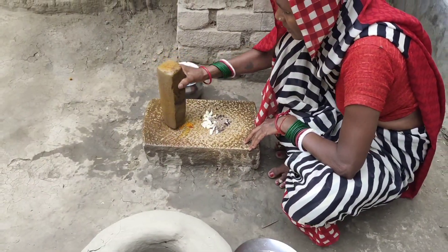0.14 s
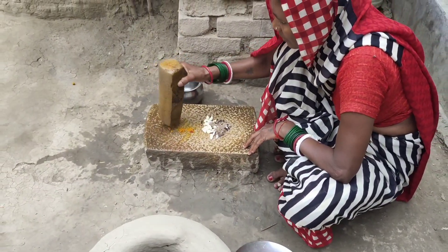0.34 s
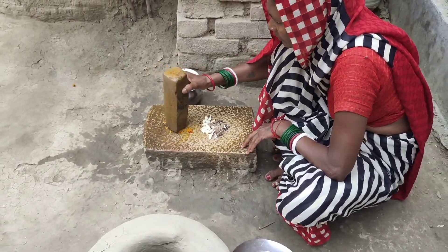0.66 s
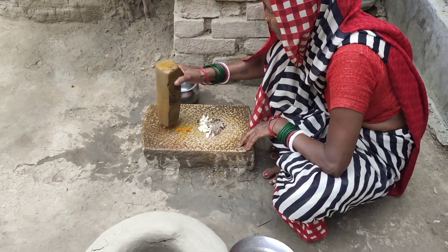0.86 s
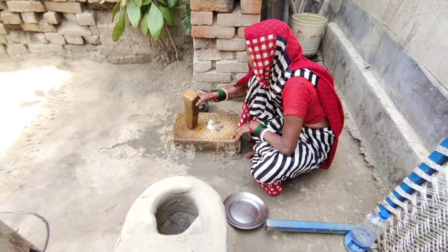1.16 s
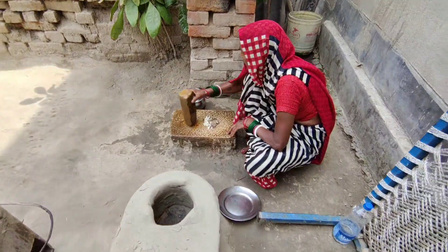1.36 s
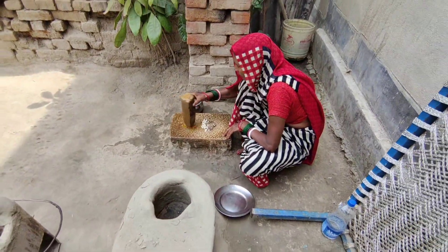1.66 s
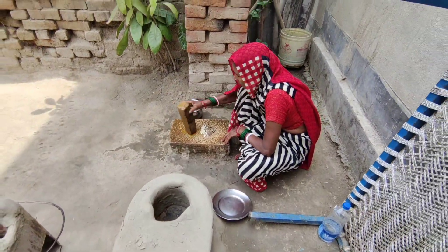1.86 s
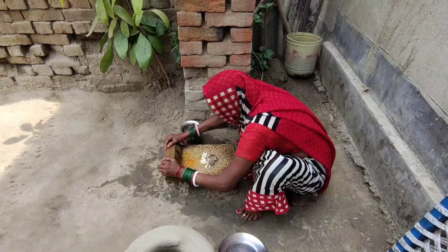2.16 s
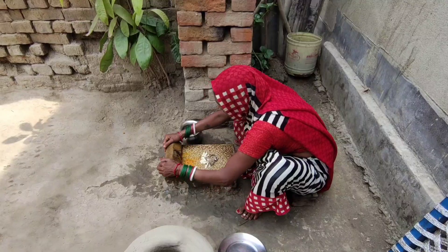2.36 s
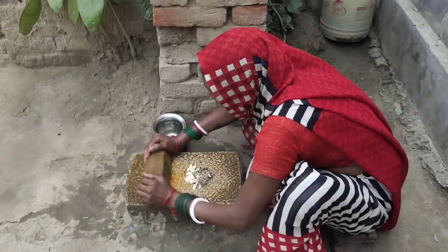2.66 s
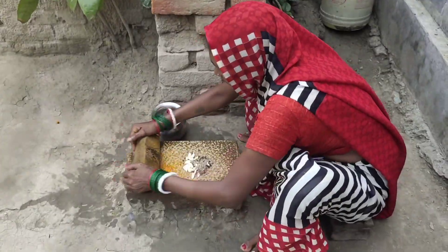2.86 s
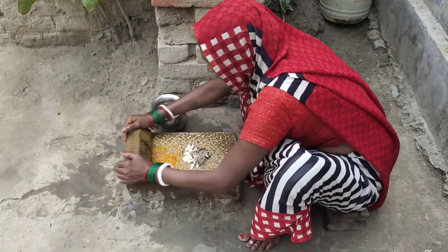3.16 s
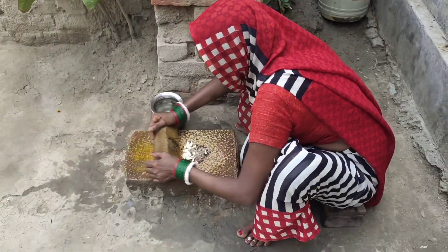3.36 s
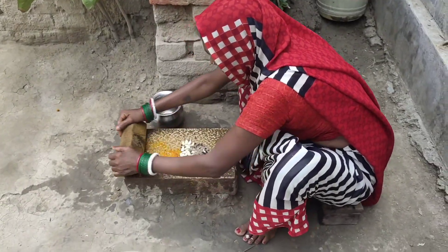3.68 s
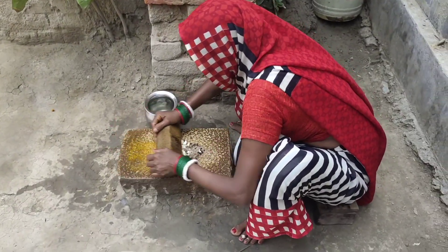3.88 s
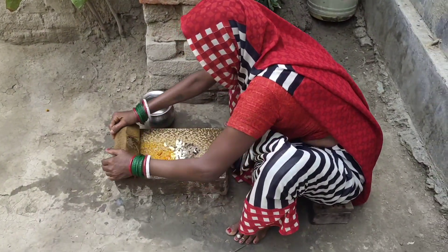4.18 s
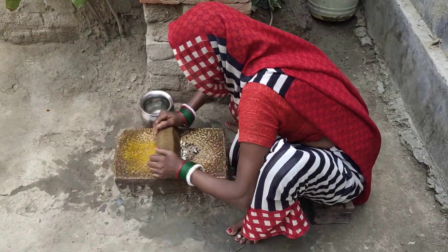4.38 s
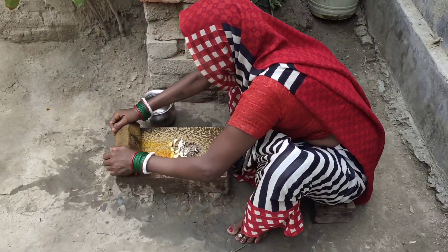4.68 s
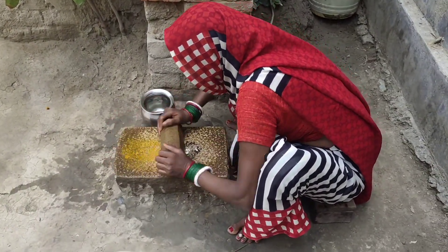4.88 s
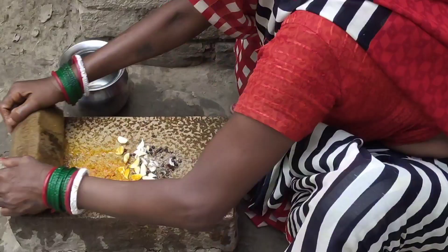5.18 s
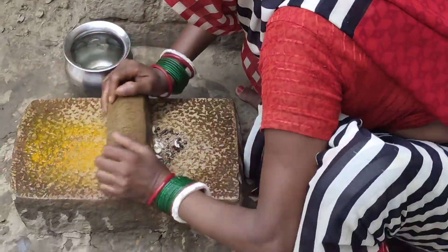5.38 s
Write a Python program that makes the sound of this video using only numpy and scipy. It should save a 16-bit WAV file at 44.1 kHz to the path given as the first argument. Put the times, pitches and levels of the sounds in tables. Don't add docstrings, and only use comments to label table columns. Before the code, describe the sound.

Seven heavy stone-on-slab blows with clinking glass bangles and a distant crow, then a brief silence and rapid gritty grinding with knocks.

```python
import sys
import numpy as np
from scipy import signal
from scipy.fft import rfft, irfft, next_fast_len
from scipy.io import wavfile
from scipy.ndimage import uniform_filter1d

SR = 44100
rng = np.random.default_rng(int(sys.argv[2]) if len(sys.argv) > 2 else 0)


def volts(x):
    e = np.asarray(x, float) / 20
    return 10 ** e


def pcm_store(signal):
    levels = np.round(np.clip(np.atleast_2d(signal), -1, 1) * 32767)
    wavfile.write(sys.argv[1], SR, levels.astype(np.int16).T)


N = 243873
TIME = np.arange(N) / SR


def level(x, db):
    return x * volts(db) / np.sqrt(np.mean(x ** 2))


def curves(spans):
    rows = np.concatenate(spans)
    on = sum((TIME > t[0][0]) & (TIME < t[-1][0]) for t in spans)
    return [np.interp(TIME, rows[:, 0], c) for c in rows.T[1:]], uniform_filter1d(1. * on, size=200)


def on_log(table, size):
    hz, value = np.transpose(table)
    return np.interp(np.log(np.fft.rfftfreq(size, 1 / SR) + 1), np.log(hz), value)


def coloured(table, size):
    spectrum = rfft(rng.standard_normal(size)) * volts(on_log(table, size))
    return level(irfft(spectrum, size), 0)


def band(x, hz, width, order=1):
    edges = np.sqrt(hz ** 2 + width ** 2 / 4) + np.array([-width, width]) / 2
    return signal.sosfilt(signal.butter(order, np.clip(edges, 20, 21000), "band", fs=SR, output="sos"), x)


def fade(t, t60):
    return np.exp(-np.log(1000) * t / t60)


def add(out, s, x):
    i = int(s * SR)
    out[..., i:i + x.shape[-1]] += x[..., :N - i]


def grains(rate, spread_db):
    hit, size, sign = rng.random((3, N))
    clicks = (hit < rate / SR) * volts(-spread_db * np.log(size + 0.0038))
    return level(clicks * np.sign(sign - .5), 0)


def walk(rate):
    k = int(SR / rate)
    steps = np.repeat(rng.standard_normal(N // k + 1), k)
    return 1.73 * uniform_filter1d(steps, size=k)[:N]


def soften(x, ms):
    t = TIME[:300] * 1000 / ms
    return signal.lfilter(t * np.exp(-t), 1, x)


def shaking(s, t60, hold, rise):
    t = (TIME - s).clip(0)
    return (1 - np.exp(-t / rise)) * fade((t - hold).clip(0), t60)


# time_s, gain_db
SCENE_GAIN = [(0, 0), (1.92, -0.5), (1.958, -8), (1.963, -97), (2.095, -93.5), (2.12, -18), (2.27, -22),
              (2.3, 0.5), (5.53, -5.5)]


def scene_gain_db(s):
    return np.interp(s, *np.transpose(SCENE_GAIN))


# frequency_hz, density_db_per_hz
YARD_AIR = [(35, -61.5), (60, -17), (514, 10), (711, -4.5), (2110, -4.5), (2840, -8), (4730, -8),
            (15000, -26)]


def air():
    shared = coloured(YARD_AIR, N)
    own = np.array([coloured(YARD_AIR, N), coloured(YARD_AIR, N)])
    return volts(-71) * (shared + own)


def traffic():
    return level(band(rng.standard_normal(N), 120.0, 200.0, order=2), -76) * volts(1.5 * walk(6.1))


# time_s, pitch_hz, level_db
CAWS = [
    [(0.51, 508.8, -61.5), (0.562, 508.2, -41.5), (0.718, 480.0, -44), (0.736, 442.5, -48),
     (0.8, 447.5, -70), (0.83, 460, -80)],
    [(1.04, 526, -75.5), (1.06, 511, -72), (1.1, 537, -80)],
    [(1.58, 542, -78.5), (1.64, 569.7, -66.5), (1.72, 599, -69.5)],
    [(1.76, 497, -54.5), (1.866, 456, -58.5), (1.952, 429, -68), (1.97, 467, -73.5)],
]
# frequency_hz, width_hz, level_db, rise_db_per_100_hz
BEAK = [(1000, 270, -10.5, 1.5), (1420, 360, -6, -2.5), (1812, 410, -5.5, -10), (2043, 440, 0, 1),
        (2420, 560, -14, 16.5), (3030, 1200, -16, -1.5)]


def crow():
    (hz, db), on = curves(CAWS)
    wander = level(uniform_filter1d(rng.standard_normal((2, N)), size=150), 0)
    shake = np.sin(np.cumsum(2 * np.pi * 68 * (1 + 0.098 * wander[0]) / SR))
    phase = np.cumsum(2 * np.pi * hz * (1 + 0.0401 * wander[1] + 0.016 * shake) / SR)
    pulses = sum(np.cos(k * phase) for k in range(1, 9))
    breath = 3.3 * rng.standard_normal(N) * (1 + np.cos(phase))
    source = pulses * (1 + 0.82 * shake) + breath
    voice = 0
    for f, width, gain, rise_db in BEAK:
        formant = level(band(source, 1. * f, 1. * width, order=2), 0)
        voice = voice + volts(gain + rise_db * (hz - 500) / 100) * formant
    return on * volts(db - 3.5) * voice


def walls(x, t60, wet_db):
    t = TIME[:SR // 2]
    echo = band(rng.standard_normal((2, len(t))), 900.0, 2500.0)
    echo = level(echo * fade(t, t60) * (1 - np.exp(-t / 0.00045)), wet_db)
    scatter = np.diff(rng.standard_normal((2, len(t) + 1))) * fade(t, .012)
    scatter = np.array([level(port, -11) for port in scatter])
    response = (echo + scatter) / np.sqrt(len(t))
    return signal.fftconvolve(x * np.ones((2, 1)), response, axes=1)[:, :N]


# time_s, level_db
SLEEVE_SWEEP = [
    (1.15, -65),
    (1.182, -56.5),
    (1.22, -53),
    (1.27, -60),
    (1.34, -61.5),
    (1.426, -71.5),
    (1.44, -71),
]


def sleeve():
    (sweep_db,), sweeping = curves([SLEEVE_SWEEP])
    fibres = rng.standard_normal(N)
    body = level(band(fibres, 1400.0, 3600.0, order=2), 4.1)
    edge = level(band(fibres, 2850.0, 1700.0, order=2), 0.5)
    return sweeping * (body + edge) * volts(sweep_db + 1.5 * walk(60))


# time_s, frequency_hz, peak_db, t60_s
LONE_RINGS = [(0.236, 5810, -41, 0.079), (0.245, 5700, -43, 0.07), (0.234, 11340, -38, 0.045),
              (0.245, 11230, -40, 0.057), (2.132, 719, -68.5, 0.1), (2.133, 1400, -74, 0.043),
              (2.306, 107.5, -42.5, 0.023), (2.306, 480, -42.5, 0.018), (4.533, 2680, -30, 0.034),
              (5.023, 1400, -41, 0.017), (5.44, 226, -54, 0.24)]


def lone_rings():
    out, t = np.zeros(N), TIME[:SR // 8]
    for s, hz, db, t60 in LONE_RINGS:
        ring = np.sin(2 * np.pi * hz * t) * fade(t, t60) * (1 - np.exp(-t / 0.000208))
        add(out, s, volts(db - scene_gain_db(s)) * ring)
    return out


TOP_HZ = 9700
OWN_SHARE = 3.7
# frequency_hz, width_hz, level_db
GLASS = [(3750, 130, -5), (5300, 200, -3), (5800, 130, -1), (6700, 220, -5), (8500, 180, -1),
         (9200, 200, -5), (10400, 300, -6), (11400, 200, -1), (12300, 350, 0), (12900, 300, -4)]
# time_s, peak_db, loudest_low_mode_hz, top_over_peak_db
POUND_CLINKS = [(0.069, -26.5, 5020, -46), (0.087, -32, 4700, -12), (0.105, -34.5, 5570, -4),
                (0.222, -37.5, 5840, -5), (0.245, -35.5, 5850, -15), (0.233, -39.5, 5530, -1),
                (0.344, -31.5, 5220, -19), (0.373, -36, 4200, -19), (0.4294, -51, 5300, -11),
                (0.472, -46, 5800, -13), (0.4943, -49, 5500, -12), (0.513, -44, 5840, -11),
                (0.5942, -27, 5450, -9), (0.644, -25, 5120, -8), (0.7667, -41.5, 5200, -14),
                (0.784, -38, 5640, -5), (0.8646, -31.5, 8700, -11), (0.8897, -23, 5470, -18),
                (0.93, -26.5, 4880, -2), (0.741, -39, 4050, -11), (1.0106, -35.5, 5220, -20.5),
                (1.037, -37.5, 5470, -19), (1.05, -38.5, 7800, 1), (1.1079, -51.5, 5500, 1.5),
                (1.1383, -43, 5770, -1.5), (1.155, -37.5, 5200, -5), (1.2364, -37.5, 4300, -24),
                (1.3254, -40.5, 3740, -8), (1.388, -47, 6870, -14), (1.713, -49.5, 3550, -9.5),
                (1.745, -30.5, 7200, -3.5), (1.1927, -26.5, 3920, -23.5), (0.616, -31, 5700, -10),
                (1.4432, -34, 4550, -27.5), (1.4693, -30.5, 5020, -3), (1.5865, -45, 6190, -11.5),
                (1.682, -41, 9430, -19), (1.733, -22.5, 8860, -8.5), (1.764, -29, 5950, -1.5),
                (1.8852, -30.5, 3720, -28.5)]
# time_s, peak_db, loudest_low_mode_hz, top_over_peak_db
GRIND_CLINKS = [(2.5206, -32.5, 4080, -10), (2.3268, -48.5, 4100, -4.5), (2.4924, -48, 3780, -4),
                (2.5423, -41.5, 6040, -8), (2.657, -42.5, 4330, -13), (2.7209, -40.5, 6800, -2.5),
                (2.7709, -34, 6450, -0.5), (2.8017, -41, 3850, -5.5), (2.9015, -39, 6740, -11.5),
                (3.0252, -40, 7870, -6.5), (3.0806, -40, 6020, -12.5), (2.94, -40, 6540, -9.5),
                (3.1401, -35, 6500, 5), (3.2009, -33.5, 4270, -16.5), (3.218, -31.5, 8410, -13.5),
                (3.2612, -39.5, 9100, -39), (3.3968, -48, 4540, -7), (3.413, -40.5, 7800, -2),
                (3.4253, -36, 7900, -14), (3.4527, -42, 7740, -6), (3.608, -39.5, 8240, 7),
                (3.662, -45, 4200, -6), (3.693, -36, 4130, -21), (3.9002, -40.5, 6260, -6),
                (3.966, -43, 6260, 8), (4.0925, -35, 4040, -20), (4.1012, -40, 5817, 6),
                (4.1382, -42, 3760, -10), (4.204, -33.5, 8200, -6), (4.452, -31, 8400, -1.5),
                (4.5602, -35.5, 9200, -32.5), (4.8442, -49, 7900, 8), (4.9131, -32, 8150, -24),
                (4.8545, -41, 3600, 1), (4.9249, -35, 8400, -7), (4.9423, -36.5, 8200, 3),
                (5.0527, -31.5, 9800, -4.5), (5.092, -38, 3970, 4), (5.12, -42, 4390, -1),
                (5.1628, -35.5, 3860, -0.5), (5.1936, -36, 6473, -19), (5.2701, -50, 3770, 6),
                (5.4204, -30.5, 3360, -26)]


def clinks():
    out, t = np.zeros((2, N)), TIME[:SR // 8]
    hz, width, db = np.transpose(GLASS)[:, :, None]
    for s, peak_db, low_hz, top_db in POUND_CLINKS + GRIND_CLINKS:
        r = rng.standard_normal((4, len(GLASS), 1))
        rings = volts(db + 2 * r[0]) * np.sin(2 * np.pi * hz * (1 + 0.023 * r[1]) * t + 3 * r[2])
        rings = rings * fade(t, 0.017 * np.exp(0.16 * r[3]))
        noise = rng.standard_normal((3, len(t)))
        decay = (fade(t, 0.021) + 0.16 * fade(t, 0.17)) * (1 - np.exp(-t / 0.00067))
        tick = (noise[0] + OWN_SHARE * noise[1:]) * decay
        low = level((rings * (hz < TOP_HZ)).sum(axis=0), -20.0)
        low = low + level(band(tick, 5380.0, 8800.0, order=2), 0.77)
        low = low + level(band(tick, low_hz, 320.0), 1.9)
        high = level((rings * (hz > TOP_HZ)).sum(axis=0), -1.4)
        high = high + level(band(tick, 10440.0, 6200.0, order=2), -3.2)
        high = high + level(band(tick, 11400.0, 380.0), -1.9)
        clink = low / np.abs(low).max() + volts(top_db) * high / np.abs(high).max()
        add(out, s, volts(peak_db - 2.5) * clink)
    return out


# start_s, level_db, top_over_level_db, settling_t60_s
JOLTS = [(0.065, -42.5, -6, 0.27), (0.225, -61, 12, 0.15), (0.346, -52, -3, 0.18), (0.47, -69.5, -20, 4.5),
         (0.594, -51, -3, 0.51), (0.886, -63.5, -9.5, 0.077), (0.93, -48, 0, 0.19), (1.048, -67, 3, 0.79),
         (1.19, -47, -19, 0.13), (1.444, -52, 3.5, 0.16), (1.54, -75, -11, 1.0), (1.73, -39, -3.5, 0.25),
         (1.884, -60, -17.5, 0.1)]
# start_s, level_db, top_over_level_db, settling_t60_s, shaken_for_s
SHAKES = [(2.289, -67.5, 5.5, 0.12, 0.05), (2.448, -76.5, 12, .3, 0.039), (2.52, -51, -3, 0.25, 0.014),
          (2.646, -52.5, -1, 0.32, 0.2), (2.882, -50, -10, 0.13, 0.011), (2.94, -53, -5, 0.64, 0.098),
          (3.141, -46, -18, 0.48, 0.012), (3.403, -49, -8.5, 1, 0.083), (3.605, -48.5, -4, 0.037, 0.077),
          (3.888, -47, -8, 0.76, 0.011), (4.094, -49, 1.5, 0.23, 0.064), (4.34, -51.5, -11, 0.27, 0.15),
          (4.558, -44, -0.5, 0.18, 0.029), (4.845, -51.5, -2, 0.17, 0.1), (5.045, -53.5, 7, 0.22, 0.08),
          (5.158, -54, 3, 0.12, 0.015), (5.19, -54, 4, 0.25, 0.02), (5.342, -53.5, -0.5, 0.3, 0.045),
          (5.418, -45.5, -3.5, 0.4, 0.06)]


def rattle():
    moves = [(db, top_db, shaking(s, t60, 0, 0.007)) for s, db, top_db, t60 in JOLTS]
    moves += [(db, top_db, shaking(s, t60, hold, 0.0065)) for s, db, top_db, t60, hold in SHAKES]
    loose = sum(volts(db) * shape for db, top_db, shape in moves)
    bright = sum(volts(db + top_db) * shape for db, top_db, shape in moves)
    own = np.array([grains(1200, 1.3) + 0.3 * rng.standard_normal(N) for port in range(2)])
    touch = (grains(1500, 0.59) + OWN_SHARE * own) * volts(2 * walk(45))
    modes = []
    for f, width, gain in GLASS:
        mode = level(band(touch, 1. * f, 1. * width), 0)
        modes.append((f, volts(gain + 3 * walk(14)) * mode))
    low = level(sum(m for f, m in modes if f < TOP_HZ), -5.5)
    low = low + level(band(touch, 8060.0, 5900.0, order=3), -4.5)
    high = level(sum(m for f, m in modes if f > TOP_HZ), 0.9)
    high = high + level(band(touch, 11580.0, 4300.0, order=3), -4.5)
    cloth = level(band(touch, 3300.0, 2100.0, order=3), -6)
    return volts(-4.5) * (loose * (low + cloth) + bright * high)


# time_s, peak_db, weight_below_700_hz_db
TAPS = [(2.354, -46, 5), (2.4, -37, -2), (2.414, -34, -2.5), (2.548, -36, -4), (2.581, -32, -5),
        (2.593, -30, -7.5), (2.628, -38, 0), (2.842, -49.5, 3), (2.863, -45, -2), (3.02, -31, -4),
        (3.086, -38.5, 3), (3.244, -37, 0.5), (3.295, -38.5, -4), (3.331, -48, -2), (3.352, -34, -9.5),
        (3.49, -48.5, -9), (3.508, -29, -8), (3.548, -32.5, -10), (3.565, -37.5, -1), (3.719, -42, -6),
        (3.74, -30.5, -5), (3.777, -33, -6), (3.805, -39.5, 3), (3.944, -49, -8), (3.904, -33.5, -8),
        (3.993, -36.5, -9), (4.043, -30.5, -2), (4.229, -41, -8), (4.268, -38, -2), (4.351, -41, -2),
        (4.381, -47, 7.5), (4.488, -39.5, -1.5), (4.532, -29, -10), (4.655, -48.5, 0), (4.698, -34.5, -3),
        (4.748, -40, -6), (4.778, -43, 1.5), (4.822, -48.5, 4.5), (4.844, -34.5, -10), (4.882, -26, -14),
        (4.936, -36.5, -0.5), (5.009, -31.5, -5), (5.025, -39, 1), (5.052, -42.5, 1.5), (5.158, -48, 4.5),
        (5.236, -38, -6)]
# time_s, peak_db, weight_below_700_hz_db, centre_hz
LAST_TAPS = [
    (5.3224, -13, -17, 1800),
    (5.3318, -23, -17, 1900),
    (5.3976, -12.5, -17, 1800),
    (5.428, -18, -22, 1500),
]


def taps():
    out, t = np.zeros(N), TIME[:SR // 8]
    edge_hz = 1345
    for s, db, low_db, hz in [(*tap, edge_hz) for tap in TAPS] + LAST_TAPS:
        rock = rng.standard_normal(len(t))
        push = soften((t == 0) + 0.055 * rock * fade(t, 0.045), 0.057)
        edge = band(push, hz, .85 * hz, order=2) + 0.7 * band(push, 2800.0, 1300.0, order=2)
        slab = band(push + 0.13 * rock * fade(t, 0.082), 521.0, 780.0, order=2)
        tap = edge / np.abs(edge).max() + volts(low_db) * slab / np.abs(slab).max()
        add(out, s, volts(db + 1.0) * tap)
    return out


# frequency_hz, width_hz, level_db
STONES = [(321, 20, -3), (480, 230, 6), (692.5, 25, 0.5), (1000, 30, -25), (1154, 140, 4.5),
          (1400, 830, -5), (1580, 104, -7), (2145, 210, -6), (2680, 62, -1)]
# start_s, fastest_s, end_s, rumble_db, grit_db
STROKES = [(2.328, 2.356, 2.41, -51, -63), (2.41, 2.39, 2.5, -64, -75), (2.543, 2.635, 2.675, -48, -48),
           (2.73, 2.876, 2.94, -54.5, -65), (3.008, 3.104, 3.13, -46, -51),
           (3.199, 3.278, 3.38, -47.5, -53.5), (3.477, 3.588, 3.61, -47, -49),
           (3.667, 3.759, 3.785, -41.5, -54.5), (3.895, 3.914, 4, -52, -51),
           (3.987, 4.02, 3.98, -43.5, -45), (4.024, 4.059, 4.12, -43.5, -50.5),
           (4.189, 4.247, 4.23, -42, -52), (4.255, 4.281, 4.35, -48, -62), (4.366, 4.385, 4.48, -66.5, -58),
           (4.48, 4.542, 4.61, -48.5, -55.5), (4.625, 4.7, 4.79, -44, -56.5),
           (4.881, 4.879, 4.93, -48, -47), (4.934, 4.96, 4.98, -58.5, -68), (4.996, 5.025, 4.68, -53, -62),
           (5.15, 5.248, 5.7, -59, -70), (5.33, 5.33, 4.4, -60, -76), (5.39, 5.44, 4.7, -41, -75)]


def grinding():
    slips = (grains(900, 1.7) + 0.56 * rng.standard_normal(N)) * volts(2.1 * walk(70))
    modes = []
    for f, width, gain in STONES:
        mode = level(band(slips, 1. * f, 1. * width), 0)
        modes.append((f, volts(gain + 1.5 * walk(9)) * mode))
    rumble = level(band(sum(m for f, m in modes if f < 900), 389.0, 620.0, order=2), 0)
    grit = level(band(sum(m for f, m in modes if f > 900), 1870.0, 1590.0, order=2), 0)
    husks = level(band(slips, 3780.0, 1400.0, order=3), 0)
    grit = grit + volts(-7) * husks
    out = np.zeros(N)
    for start, fastest, end, rumble_db, grit_db in STROKES:
        speed = np.sin(np.interp(TIME, [start, fastest, end], [0, np.pi / 2, np.pi])).clip(0)
        out += volts(rumble_db) * speed ** 1.11 * rumble
        out += volts(grit_db) * speed ** 1.66 * grit
    return out


# time_s, thud_peak_db, crack_db, edge_ring_db
POUNDS = [
    (0.07, -28.5, -33, -51),
    (0.348, -30, -37.5, -50),
    (0.615, -29, -32, -49),
    (0.889, -25.5, -39, -33.5),
    (1.157, -31.5, -56.5, -82.5),
    (1.445, -26.5, -34, -44),
    (1.731, -25, -32.5, -46.5),
]
# frequency_hz, level_db, t60_s
SLAB = [(314.4, -0.5, 0.05), (396, 3, 0.024), (538.5, -4.5, 0.036), (676, -9.5, 0.03)]
# frequency_hz, density_db_per_hz
GROUND = [(29, -28), (50, -7), (145, -0.5), (313, -7.5), (627, -7.5), (800, -15.5), (1040, -53.5),
          (1760, -120)]


def pounds():
    out, t = np.zeros(N), TIME[:SR // 2]
    for s, db, crack_db, edge_db in POUNDS:
        ring = np.zeros(len(t))
        for hz, gain, t60 in SLAB:
            stronger, higher = rng.standard_normal(2)
            mode = np.sin(2 * np.pi * hz * (1 + 0.025 * higher) * t) * fade(t, t60)
            ring += volts(gain + 2.1 * stronger) * mode
        ring = -ring * (1 - np.exp(-t / 0.0017))
        ring = ring / np.abs(ring).max()
        soil = coloured(GROUND, len(t)) * (1 - np.exp(-t / 0.016))
        boom = band(soil, 100.0, 140.0) * fade(t, 0.38)
        boom = boom + band(soil, 240.0, 130.0) * fade(t, 0.3)
        boom = boom + band(soil, 420.0, 400.) * fade(t, 0.18)
        crack = band(rng.standard_normal(len(t)), 4000.0, 5000., order=2)
        crack = crack * (fade(t, 0.0083) + volts(-22) * fade(t, .25))
        edge = band(rng.standard_normal(len(t)), 944.0, 650.0, order=2) * fade(t, 0.031)
        add(out, s, volts(crack_db + 5.5) * crack)
        thud = volts(db + 0.5) * (ring + volts(-12.5) * boom)
        add(out, s + .0022, thud + volts(edge_db + 18.5) * edge)
        add(out, s + .023, volts(db - 11) * ring)
    return out


def scene():
    bird = crow()
    near = sleeve() + lone_rings() + clinks() + rattle() + taps() + grinding() + pounds()
    mix = air() + traffic() + bird + near
    mix = mix + walls(bird, t60=0.27, wet_db=-0.5) + walls(near, t60=0.19, wet_db=-13)
    return mix * volts(scene_gain_db(TIME))


# frequency_hz, gain_db
PORT_GAIN = [(60, -4.5), (110, -2.5), (200, .5), (380, 2.5), (700, 1.5), (2380, 4.5), (4400, 4), (15000, 8)]
# frequency_hz, phase_rad
PORT_PHASE = [(60, 0.44), (150, 1.4), (400, 0.12), (900, 0.64)]


def microphone_ports(dry):
    size = next_fast_len(N + 4096)
    lag = 2 * np.pi * np.fft.rfftfreq(size) * 7.32
    half = volts(on_log(PORT_GAIN, size) / 2) * np.exp(.5j * (on_log(PORT_PHASE, size) - lag))
    ports = irfft(rfft(dry, size) * np.array([half, 1 / half]), size)[:, :N]
    ports = signal.sosfilt(signal.butter(4, 66, "high", fs=SR, output="sos"), ports)
    return signal.sosfilt(signal.butter(12, 15400, fs=SR, output="sos"), ports)


def roll_off(x):
    return signal.sosfilt(signal.butter(12, 16400, fs=SR, output="sos"), x)


def record(dry):
    mix = microphone_ports(dry)
    return roll_off(mix)


dry = scene()
out = record(dry)
pcm_store(out)
```